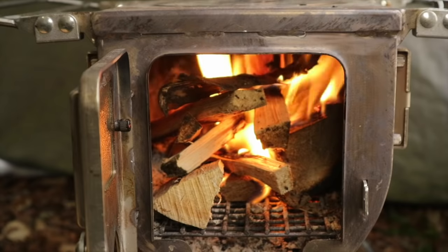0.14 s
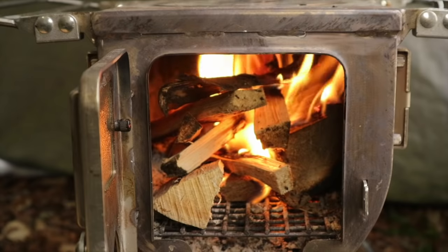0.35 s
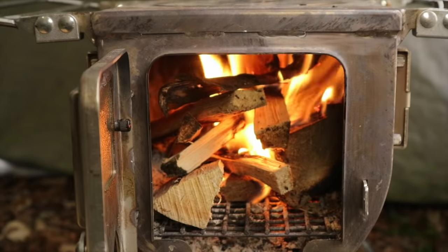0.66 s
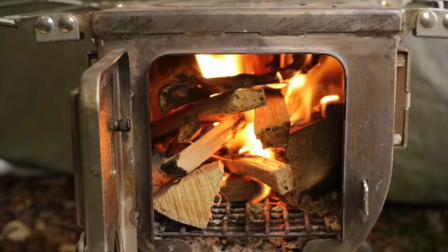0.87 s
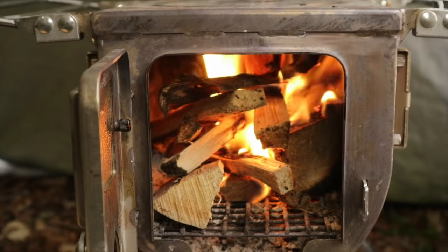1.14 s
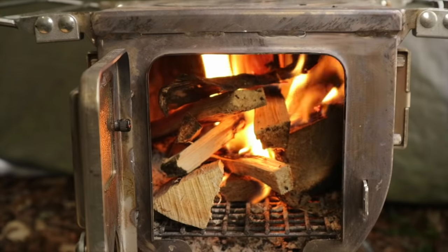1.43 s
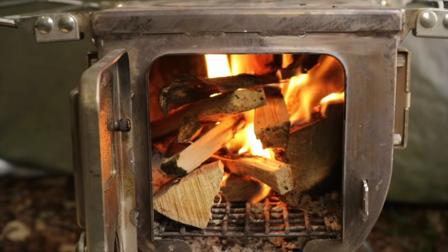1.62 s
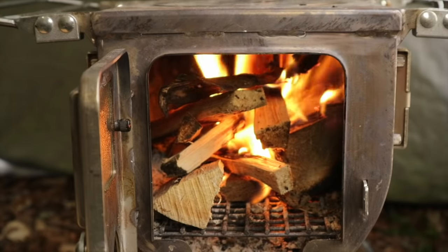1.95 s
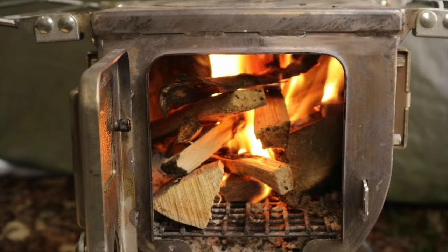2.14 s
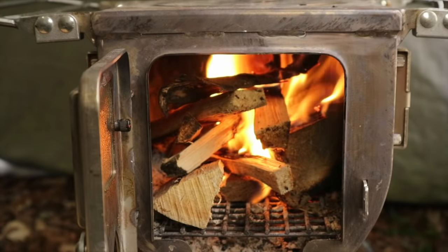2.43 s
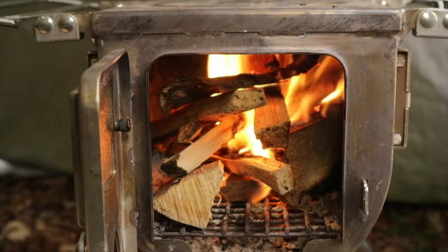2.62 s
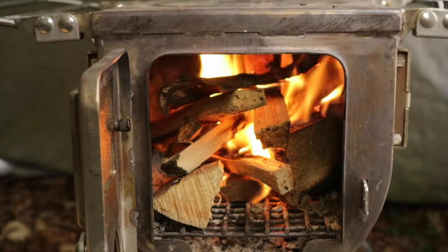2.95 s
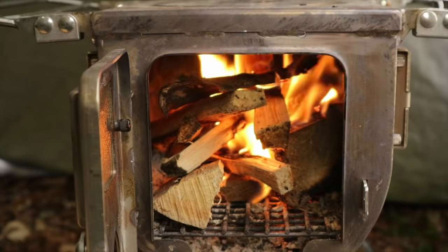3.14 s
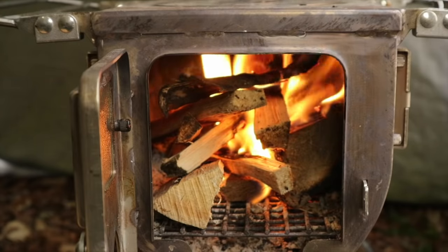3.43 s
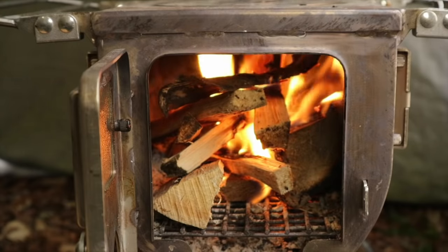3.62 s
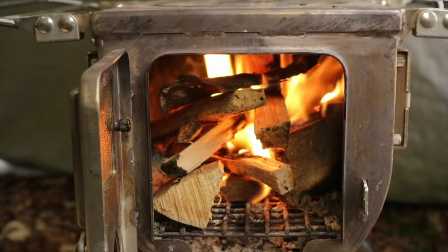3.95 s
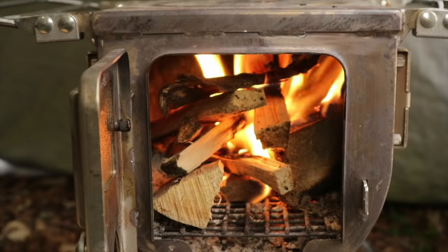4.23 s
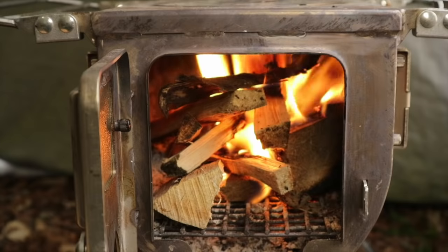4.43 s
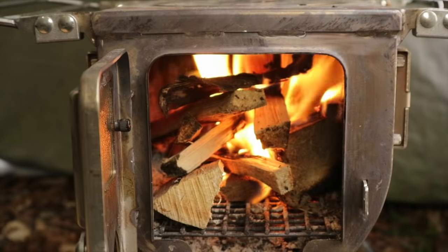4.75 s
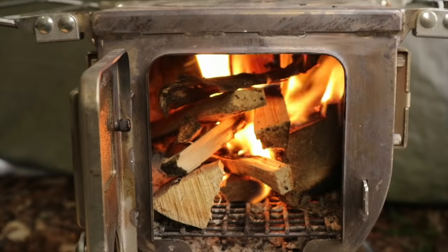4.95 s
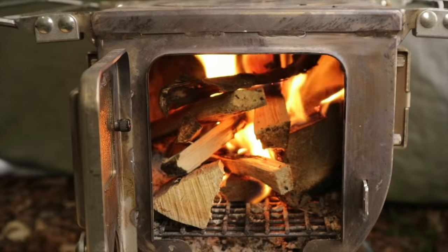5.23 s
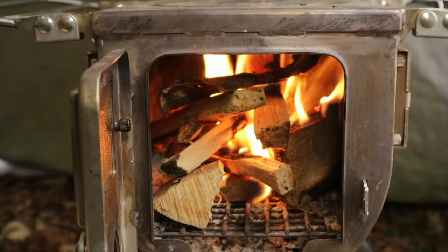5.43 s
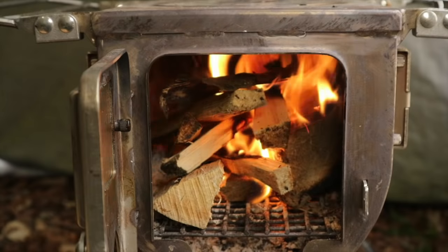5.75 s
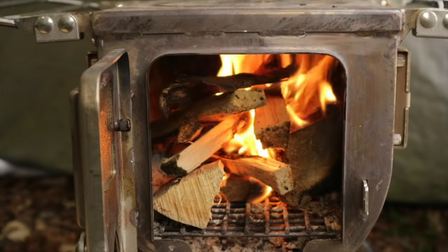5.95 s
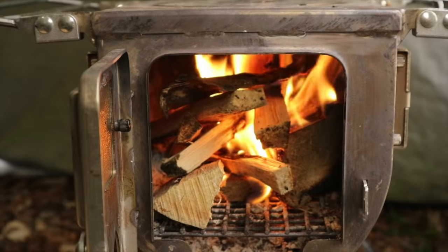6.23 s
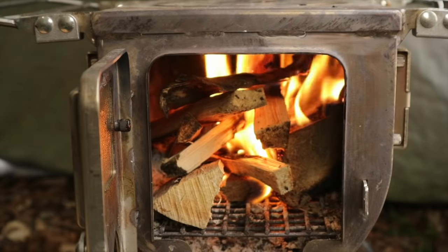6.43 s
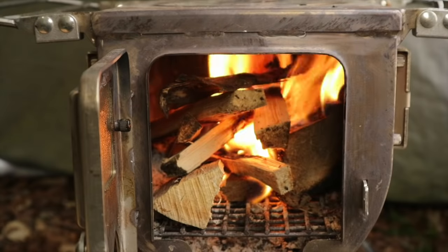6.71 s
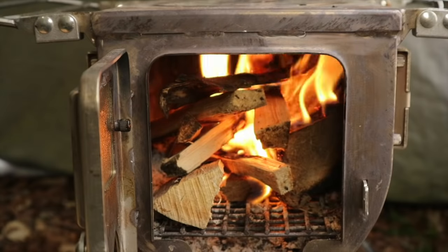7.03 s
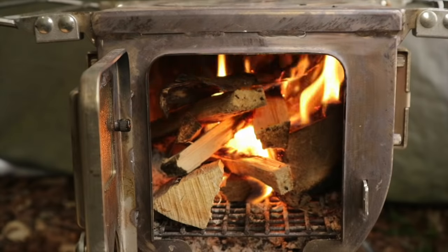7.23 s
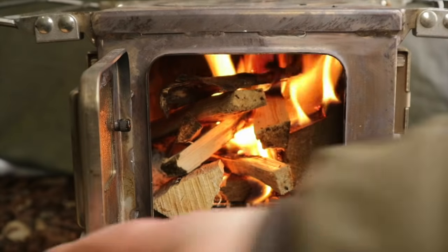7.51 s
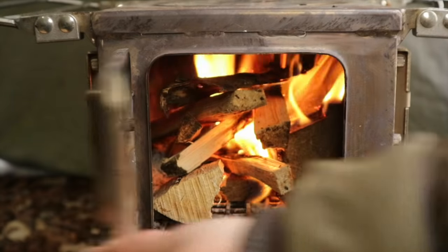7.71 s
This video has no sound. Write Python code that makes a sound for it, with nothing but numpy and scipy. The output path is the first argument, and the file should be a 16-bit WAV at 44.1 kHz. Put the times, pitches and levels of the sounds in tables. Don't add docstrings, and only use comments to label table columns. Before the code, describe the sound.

Close to an open steel wood stove in a tent, a soft low fire roar runs throughout with fine bark ticks and occasional loud, boxy pops. A faint high bird peeps at the start; midway a larger bird rattles harshly among the trees outside and clucks. Pops thicken towards the end, then a sleeve rubs close by and the metal door is pushed with small knocks.

```python
import sys
import numpy as np
from scipy import signal
from scipy.fft import rfft, irfft, next_fast_len
from scipy.io import wavfile
from scipy.ndimage import uniform_filter1d, map_coordinates

SR = 44100
rng = np.random.default_rng(int(sys.argv[2]) if len(sys.argv) > 2 else 0)


def unload_wav(signal):
    wavfile.write(
        sys.argv[1],
        SR,
        np.round(np.clip(np.atleast_2d(signal).T, -1, 1) * 32767).astype(np.int16),
    )


def invert_db(x):
    u = np.asarray(x, float) / 20
    return 10 ** u


N = 347067
TOP_HZ = 15800


def unit(x):
    return x / np.sqrt(np.mean(x ** 2) + 1e-20)


def along(points, hz):
    f, v = np.transpose(points)
    return np.interp(np.log(hz + 1), np.log(f + 1), v)


def curves(rows):
    s, *cols = np.transpose(rows)
    return [np.interp(np.arange(N) / SR, s, c) for c in cols]


def wobble(rate, size=N):
    knots = rng.standard_normal(int(size * rate / SR) + 4)
    return map_coordinates(knots, [np.arange(size) * rate / SR])


def filtered(x, response):
    m = next_fast_len(x.shape[-1] + 8192)
    return irfft(rfft(x, m) * response(np.fft.rfftfreq(m, 1 / SR)), m)[..., :x.shape[-1]]


def resonances(modes):
    def mode(f, c, w, db):
        return invert_db(db) * 1j * f * w / (c * c - f * f + 1j * f * w)

    return lambda f: sum((-1) ** k * mode(f, *row) for k, row in enumerate(modes))


def add(track, s, sound):
    part = track[..., round(s * SR):][..., :sound.shape[-1]]
    part += sound[..., :part.shape[-1]]


# (frequency [Hz], likeness [0-1])
COHERENCE = [(60, 1), (180, 0.8346), (550, 0.83), (1650, 0.56), (4970, 0.26), (15000, 0.58)]


def rush(response, patchy_db, alike=COHERENCE):
    z = signal.stft(rng.standard_normal((2, N)), nperseg=512)[2]
    field = uniform_filter1d(rng.standard_normal(z.shape[1:]), 6, 0)
    field = uniform_filter1d(field, 10, 1)
    pair = signal.istft(z * invert_db(patchy_db * unit(field)), nperseg=512)[1][:, :N]

    def spread(hz):
        turn = np.arccos(np.clip(along(alike, hz), -1, 1)) / 2
        return (hz < TOP_HZ) * response(hz) * [np.cos(turn), np.sin(turn)]

    mid, side = filtered(pair, spread)
    return unit(np.array([mid + side, mid - side]))


def tail(t60s, seconds, side_db):
    hz, t, z = signal.stft(rng.standard_normal((2, round(seconds * SR))), SR, nperseg=64)
    mid, side = signal.istft(z * invert_db(-60 * t / along(t60s, hz)[:, None]), SR, nperseg=64)[1]
    side = invert_db(side_db) * side
    return np.array([mid + side, mid - side]) / np.linalg.norm(mid)


def scattered(sound, t60s, seconds, side_db):
    return signal.fftconvolve(sound[None], tail(t60s, seconds, side_db), axes=1)


# (time [s], firebox tone level [dB])
DRAUGHT = [(0, -61), (.5, -71), (1.6, -76), (2, -61), (2.54, -54.5), (3.04, -60.5), (3.66, -57.5),
           (4.23, -55.5), (4.51, -62.5), (5.76, -64.5), (6.5, -64), (7.87, -65)]
# (frequency [Hz], level [dB per Hz])
HISS = [(15, -36), (25, -18), (113, -5), (169, -4), (390, -4), (616, -4), (2020, -15.5), (5920, -18.5),
        (7540, -16.5), (9610, -20), (14400, -17), (15600, -20.5)]


def flames():
    tone_db, = curves(DRAUGHT)
    low_db = -58.5 + 0.21 * (tone_db - tone_db.mean()) - 0.1 * np.arange(N) / SR
    low_db = low_db + 0.7 * wobble(2.81)
    tone_db = tone_db - 0.5 + 0.2 * wobble(7) + 3.05 * wobble(30)
    low = invert_db(low_db - 6) * rush(resonances([(168.0, 40, 3), (248, 260, -4.0)]), patchy_db=1.7)
    tone = invert_db(tone_db) * rush(resonances([(616.5, 88, 0)]), patchy_db=2.0)
    hiss = invert_db(-57) * rush(lambda hz: invert_db(along(HISS, hz)), patchy_db=1.52)
    return low + tone + hiss


# (time [s], peak level [dB])
TICKS = [(.0886, -46), (.2424, -40), (.2933, -42), (.4318, -41), (.622, -44), (.804, -46), (.9374, -44),
         (1.255, -47.5), (1.433, -45), (1.5782, -40.5), (1.7294, -47), (2.1439, -45), (2.2647, -44),
         (2.7215, -41), (2.7685, -43), (2.8393, -45), (3.0678, -39.5), (3.2993, -55), (3.3276, -40),
         (3.4873, -44), (4.548, -49), (4.9121, -42), (5.1057, -44), (6.7365, -45), (6.971, -46.5),
         (6.992, -46)]
# (time [s], peak level [dB], centre frequency [Hz])
SPITS = [(2.6725, -43, 12600), (2.7492, -35.5, 15000), (2.9399, -21.5, 13940), (3.4046, -40, 13300),
         (5.2737, -37.5, 12500), (5.4, -38, 12730), (6.291, -46, 12900), (6.8957, -9, 14800),
         (6.8964, -25, 12500)]
# (frequency [Hz], T60 [s])
CRACK_T60 = [(500, 0.13), (1800, 0.058), (5000, 0.10848), (13000, 0.077)]


def ticks():
    tick_hz, spread = 7780, 0.047
    luck = rng.random((260, 3))
    scatter_db = -56 - 3.5 * np.log(luck[:, 1] + .05)
    scatter = np.c_[luck[:, 0] * N / SR, scatter_db, 7500 + 6000 * (2 * luck[:, 2] - 1) ** 3]
    clear = np.c_[TICKS, tick_hz * np.exp(spread * rng.standard_normal(len(TICKS)))]
    out, t = np.zeros(N), np.arange(128) / SR
    for s, db, hz in [*clear, *SPITS, *scatter]:
        cycles = np.sin(2 * np.pi * hz * t) * invert_db(-60 * t * hz / 16)
        grit = rng.standard_normal(128) * invert_db(-60 * t / 0.0047)
        snap = cycles + .65 * min(tick_hz / hz, 1) ** 2 * grit
        add(out, s + .0007, invert_db(db + 2.0) * snap)
    return out + invert_db(-3.5) * scattered(out, CRACK_T60, .1, side_db=-50.0)[:, :N]


# (frequency [Hz], T60 [s])
TREES_T60 = [(2000, 0.77), (5000, 0.53), (10000, 1.0)]
# (time [s], length [s], pitch [Hz], level [dB], warble depth [Hz])
PEEPS = [
    (0.076, 0.16, 7020, -53.5, 302.4),
    (5.886, 0.055, 7450, -55.5, 700),
    (6.549, 0.05957, 7420, -53, 700),
]


def small_bird():
    out = np.zeros(N)
    for s, length, hz, db, depth_hz in PEEPS:
        t = np.arange(round(length * SR)) / SR
        warble = depth_hz * np.exp(-t / (1.9 * length)) * np.sin(2 * np.pi * 35.5 * (t - .004))
        warble = warble + 180 * wobble(160, size=len(t))
        flutter_db = 4 * wobble(120, size=len(t))
        swell = np.abs(np.sin(np.pi * t / length)) ** 0.32
        tone = np.sin(2 * np.pi * np.cumsum(hz + warble) / SR)
        add(out, s, swell * invert_db(db + flutter_db) * tone)
    return invert_db(-4.0) * out + scattered(invert_db(-6) * out, TREES_T60, 0.37, side_db=-57.5)[:, :N]


# (frequency [Hz], width [Hz], level [dB])
BOX_LOW = [(200, 34, 14.3), (261, 16, 2.3), (150, 53, 0.79)]
BOX_HIGH = [(560.7, 45, 6), (597, 135, 5), (746, 207, -1.5), (400, 110, -21.5)]


def strikes(rows):
    out, low, high = np.zeros((2, N)), np.zeros(N), np.zeros(N)
    t = np.arange(round(.008 * SR)) / SR
    for s, db, body_db, ring_db, knock_db in rows:
        s += .001
        bounces = rng.standard_normal(len(t)) ** 3 * invert_db(-60 * t / 0.068) / (1 + (t / 0.002) ** 8)
        bounces = bounces / np.linalg.norm(bounces)
        colour = resonances([(1137.6, 710, knock_db - db + 20.0), (2900, 1250, body_db - db + 19.5),
                             (7222, 3000, -0.8), (12500, 1800, -0.6), (15016, 770, -10)])
        snap = invert_db(db + 7.5) * filtered(1. * (t == 0), colour)
        add(out, s, snap + invert_db(-5) * signal.fftconvolve(snap, bounces)[:len(t)] * 2.62)
        add(out, s + 0.0016, invert_db(-3) * scattered(snap, CRACK_T60, .12, side_db=-51))
        add(low, s, invert_db(ring_db + 13.0) * np.hanning(24))
        add(high, s, -invert_db(ring_db + 27.0) * np.hanning(24))
    ring = filtered(low, resonances(BOX_LOW)) + filtered(high, resonances(BOX_HIGH))
    late = scattered(ring, [(200, 0.26), (700, 0.15)], .25, side_db=-43)[:, :N]
    return out + ring + invert_db(-5.5) * late


# (time [s], crack level [dB], body level [dB], box ring level [dB], knock level [dB])
POPS = [(.4993, -12, -30, -38.5, -29), (.5975, -55, -67, -54.5, -61), (.637, -52, -59, -67, -58),
        (.7098, -27, -48, -54, -45), (1.3364, -34, -52, -60, -53), (1.347, -47, -59, -67, -55),
        (1.821, -52, -56, -61, -62), (2.785, -43, -57, -62, -71), (2.9392, -20, -44, -56.5, -53),
        (4.7416, -29, -38, -49.5, -46), (5.6299, -48, -59, -49, -59), (5.6994, -11.5, -24, -27.5, -27),
        (5.874, -44, -41.5, -37.5, -39), (5.9189, -24, -43, -50.5, -46), (6.0696, -30, -52, -68, -72),
        (6.2228, -41, -51.5, -63, -63), (6.2554, -58, -72, -51, -65), (6.6194, -35, -48, -77, -42),
        (6.632, -4.5, -25, -33.5, -26.5), (6.7894, -49.5, -57, -45.5, -48), (6.8952, -23.5, -29, -36, -27),
        (7.1272, -16, -28.5, -32.5, -31.5)]


def pops():
    return strikes(POPS)


def hoarse(length, start_hz, end_hz, db, rough_hz):
    n = round(length * SR)
    phase = 2 * np.pi * np.cumsum(np.linspace(start_hz, end_hz, n)) / SR
    shiver = wobble(2 * rough_hz, size=n) + 0.29 * wobble(6 * rough_hz, size=n)
    shiver = shiver + 0.074 * wobble(16 * rough_hz, size=n)
    flutter = unit(.5 + shiver * np.clip(rough_hz / 200, .1, 3))
    swell = np.abs(np.sin(np.linspace(0, np.pi, n))) ** .5
    return invert_db(db) * swell * flutter * np.sin(phase)


# (time [s], whistle level [dB], main pitch [Hz])
RATTLE = [(3.8054, -23, 4200), (3.888, -29, 4180), (3.9751, -25.5, 4143), (4.0602, -21, 4220),
          (4.1361, -25, 4242), (4.2183, -25.5, 4460), (4.3007, -27, 4280), (4.3877, -19, 4183),
          (4.4728, -24, 4160), (4.559, -29.5, 4220), (4.6378, -22, 4374), (4.7241, -29, 4040)]
# (delay [s], length [s], start ratio, end ratio, level [dB], roughness [Hz])
SYLLABLE = [
    [(0, 0.0262, .96, 1.01, 0.5, 69.3), (0, 0.024, 1.7, 2.05, -26, 293), (0, 0.034, 2.98, 2.95, -31, 400)],
    [(.006, 0.018, .8, .74, -2.5, 69.43), (.028, .014, .8, .68, -11, 200),
     (.036, 0.0181, .66, .51, -7, 103.5)],
    [(.02, 0.0275, 1.03, .85, -0.5, 450), (0.019, 0.033, 1.41, 1.38, -8.5, 220),
     (0.022, 0.0303, 1.22, 1.15, -9, 600), (0.0098, 0.0379, 1.5, 1.5, -14, 1300),
     (0.006, 0.056, 2.5, 1.8, -24, 1300), (0.0072, 0.032, 2.6, 3.1, -26, 1800),
     (0.0015, .05, 1.3, 1.1, -9, 1000)],
]
# (time [s], length [s], pitch [Hz], level [dB])
CROAKS = [
    (3.739, 0.039, 3445, -38),
    (4.823, 0.06, 3800, -40),
    (4.897, 0.0496, 3920, -39.5),
    (4.979, 0.069, 3880, -44),
]
# (start ratio, end ratio, level [dB], roughness [Hz])
CROAK = [(1, 1.01, -1, 106), (.67, .62, -4, 98), (0.94, 1.3, -3, 920), (1.2, 0.69, -4.5, 360),
         (1.4, 1.7, -14.5, 300)]
# (time [s], length [s], pitch [Hz], level [dB], roughness [Hz])
WHOOPS = [
    (4.989, .13, 2286, -43, 150),
    (5.03, 0.0683, 2790, -39, 351),
]
# (time [s], pitch [Hz], level [dB])
CLUCKS = [(3.677, 2110, -43.5), (5.17, 2280, -48), (5.23, 2420, -43.5), (5.292, 2220, -46.5),
          (5.336, 2395, -45.5), (5.394, 2380, -45), (5.491, 2003, -48)]
# (time [s], length [s], pitch [Hz], level [dB], roughness [Hz])
WHEEZES = [
    (3.679, 0.024, 1900, -48, 905),
    (3.687, 0.21, 2900, -53, 923),
    (4.833, 0.28, 7100, -61.5, 2560),
    (5.168, 0.33, 1550, -60, 300),
    (5.485, .09, 1571, -66, 400),
]


def large_bird():
    out = np.zeros(N)
    for s, whistle_db, hz in RATTLE:
        since = s - RATTLE[0][0]
        levels_db = [whistle_db, -32 + 3.5 * since, -22 - 3.5 * since]
        for db, parts in zip(levels_db, SYLLABLE):
            for delay, length, start, end, part_db, rough in parts:
                pitch = hz * (1 + 0.0196 * rng.normal())
                note_db = db + part_db - 8 + 0.96 * rng.normal()
                add(out, s + delay, hoarse(length, start * pitch, end * pitch, note_db, rough))
    for s, length, hz, db in CROAKS:
        for start, end, part_db, rough in CROAK:
            add(out, s, hoarse(length, start * hz, end * hz, db + part_db, rough))
    for s, length, hz, db, rough in WHOOPS:
        add(out, s, hoarse(length, hz, 1.11 * hz, db, rough))
    for s, hz, db in CLUCKS:
        add(out, s, hoarse(0.0315, hz, 0.97 * hz, db, rough_hz=384))
    for s, length, hz, db, rough in WHEEZES:
        add(out, s, hoarse(length, hz, hz, db, rough))
    return out + scattered(invert_db(-1) * out, TREES_T60, 0.37, side_db=-57.5)[:, :N]


# (time [s], level [dB])
SLEEVE = [(6.784, -54), (6.86, -54), (7.2, -52), (7.29, -49), (7.47, -46.5), (7.61, -51), (7.72, -60),
          (7.78, -56), (7.87, -52)]
# (frequency [Hz], level [dB per Hz])
CLOTH_DULL = [(88, -38), (150, -19.5), (363, -12), (414, -9.5), (454, -11.5), (2150, -10.5), (3500, -17.5),
              (4550, -36), (7700, -120)]
CLOTH_BRIGHT = [(2940, -7), (5000, -1.5), (6980, -3), (7930, -1.5), (9920, -7), (11900, -4.5), (15600, -14)]


def sleeve():
    dull_db, = curves([(6.772, -80), *SLEEVE])
    since = np.clip(np.arange(N) / SR - SLEEVE[0][0], 0, None)
    late_db = -6.5 * np.exp(-since / 0.024)
    scrape_db = dull_db - 1.5 + late_db + 2.5 * wobble(25)
    bright_db = dull_db - 3.5 + late_db
    near = [(1000, .999)]
    dull = rush(lambda hz: invert_db(along(CLOTH_DULL, hz)), patchy_db=1.5, alike=near)
    scrape = rush(resonances([(3800, 2500, 0)]), patchy_db=-2.0, alike=near)
    bright = rush(lambda hz: invert_db(along(CLOTH_BRIGHT, hz)), patchy_db=1.0, alike=near)
    rubbing = invert_db(dull_db + 3.0) * dull + invert_db(scrape_db) * scrape + invert_db(bright_db + 2.5) * bright
    return invert_db(0.9853 * wobble(400)) * rubbing


# (time [s], low mode level [dB], box mode level [dB])
DOOR = [
    (7.175, -38.5, -43.5),
    (7.392, -49, -38.5),
    (7.52, -55, -46),
    (7.702, -45, -70),
    (7.854, -34.5, -32),
]


def door():
    s, *levels_db = np.transpose(DOOR)[..., None]
    late = np.arange(N) / SR - s
    slope_db = np.where(late < 0, 350 * late, -248 * late)
    low_gain, box_gain = [invert_db(db + slope_db).sum(axis=0) for db in levels_db]
    shake = rng.standard_normal((2, N)) * invert_db(0.85 * wobble(80))
    low = unit(filtered(shake[0], resonances([*BOX_LOW, (360, 120, 5)])))
    box = unit(filtered(shake[1], resonances(BOX_HIGH)))
    return invert_db(-7.5) * low_gain * low + invert_db(-4.5) * box_gain * box


# (time [s], crack level [dB], body level [dB], box ring level [dB], knock level [dB])
KNOCKS = [(7.362, -40.5, -47.5, -45, -47), (7.3866, -29, -40.5, -44.5, -45), (7.5288, -41.5, -58, -48, -45),
          (7.5845, -42.5, -44, -55, -41), (7.6377, -49.5, -47, -68, -34), (7.6894, -44, -61, -50, -52),
          (7.7006, -45, -66, -45.5, -68), (7.8454, -48.5, -54, -45, -45.5), (7.8614, -51, -50, -40, -40)]


def knocks():
    return strikes(KNOCKS)


def scene():
    return flames() + ticks() + small_bird() + pops() + large_bird() + sleeve() + door() + knocks()


def low_pass(x):
    return signal.sosfilt(signal.butter(12, 16820, fs=SR, output="sos"), x)


def record(dry):
    dry = filtered(dry, lambda hz: (1j * hz / (1j * hz + 30)) ** 2)
    mix = dry / (1 + np.abs(dry / .42) ** 3) ** (1 / 3)
    return low_pass(mix)


dry = scene()
out = record(dry)
unload_wav(out)
```